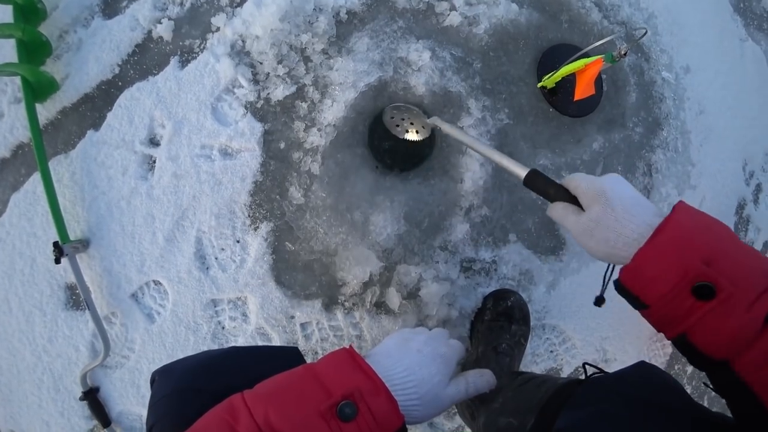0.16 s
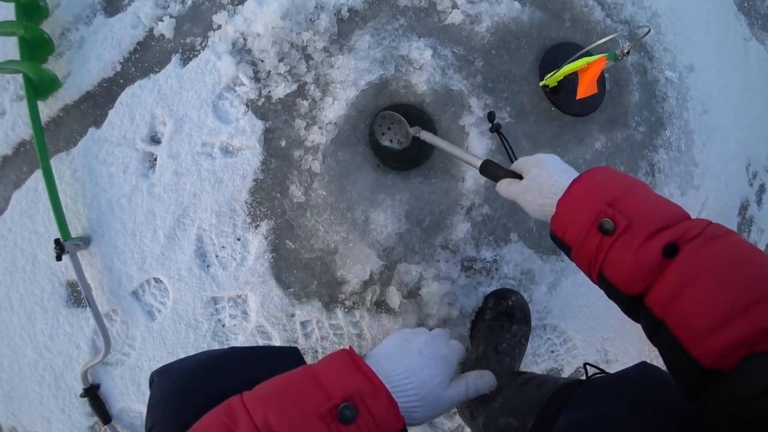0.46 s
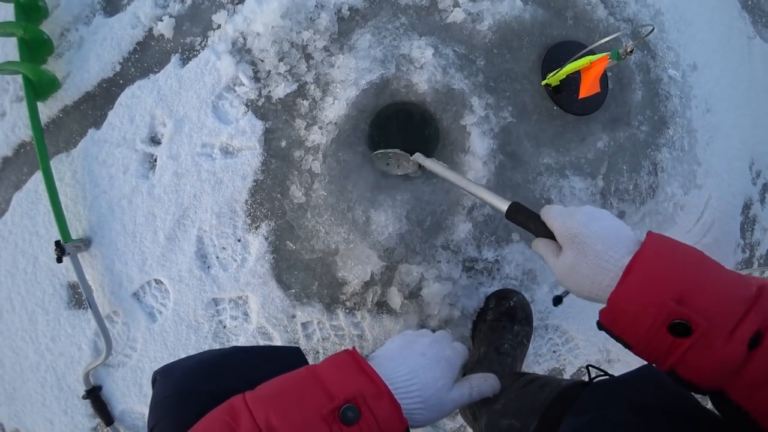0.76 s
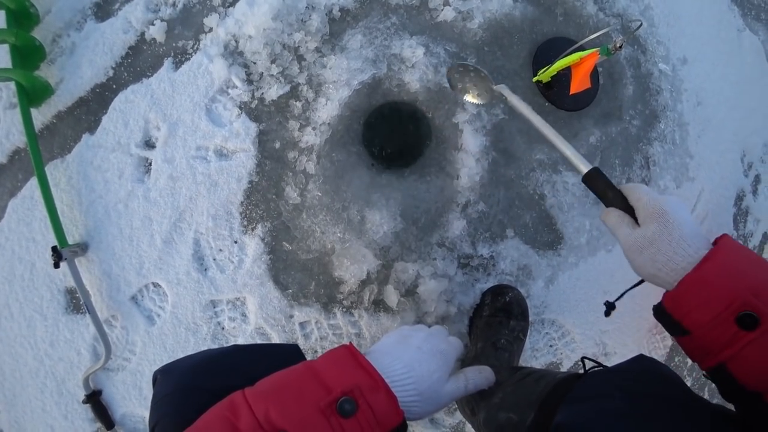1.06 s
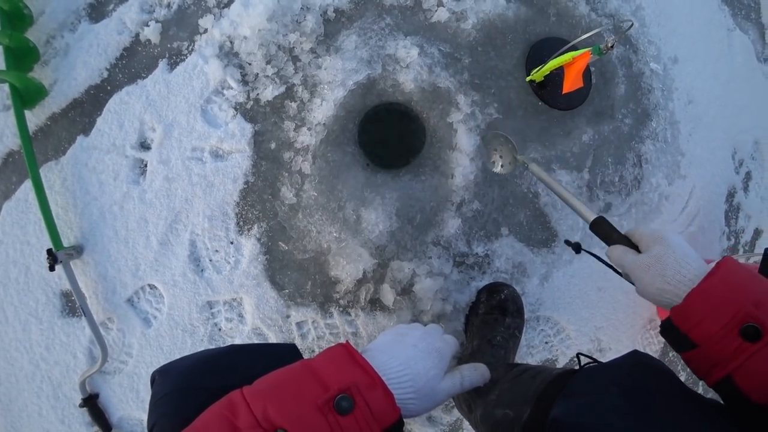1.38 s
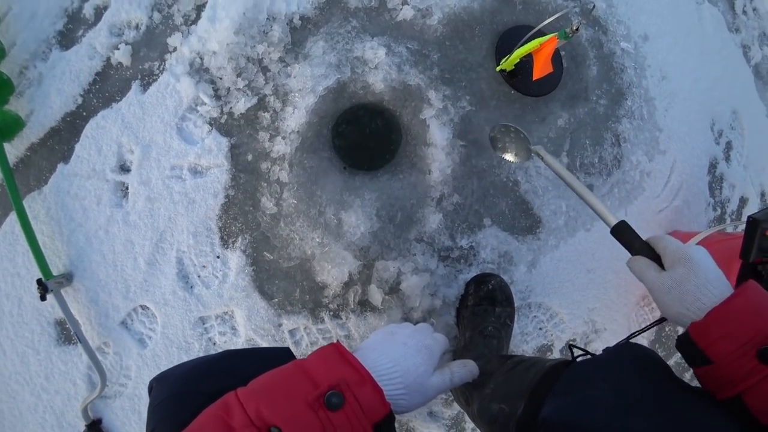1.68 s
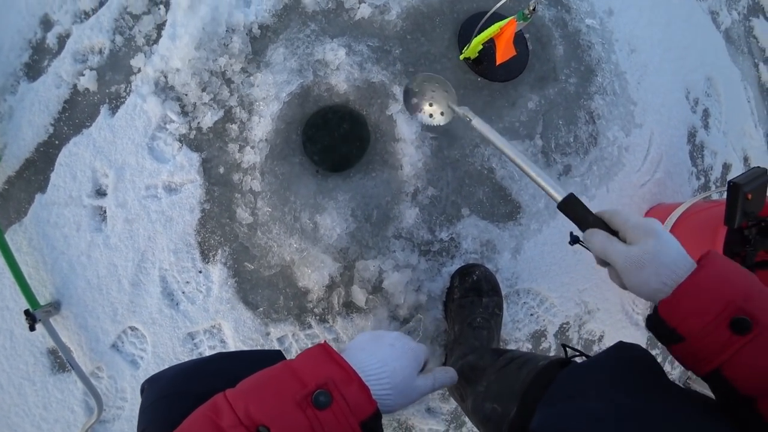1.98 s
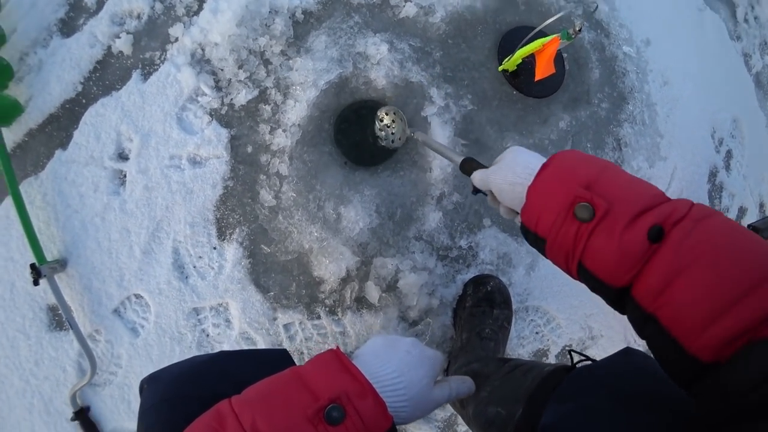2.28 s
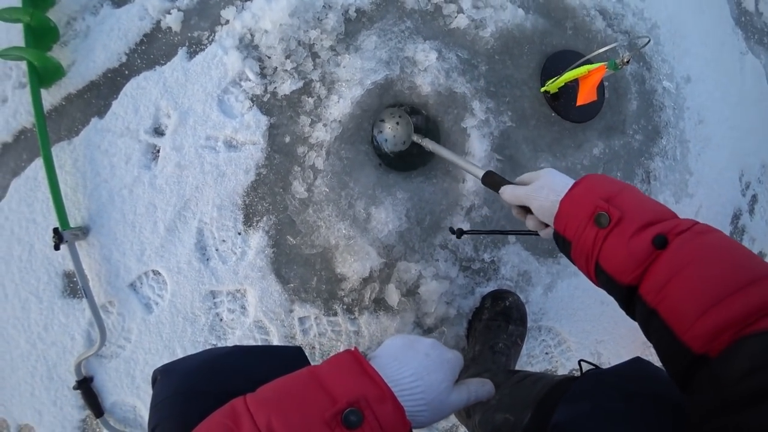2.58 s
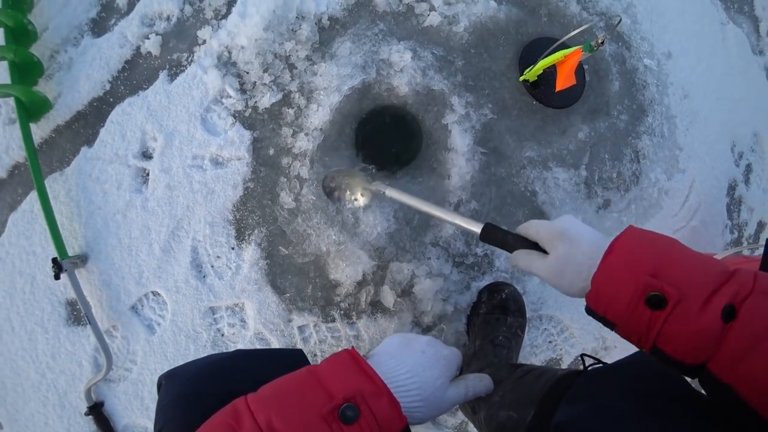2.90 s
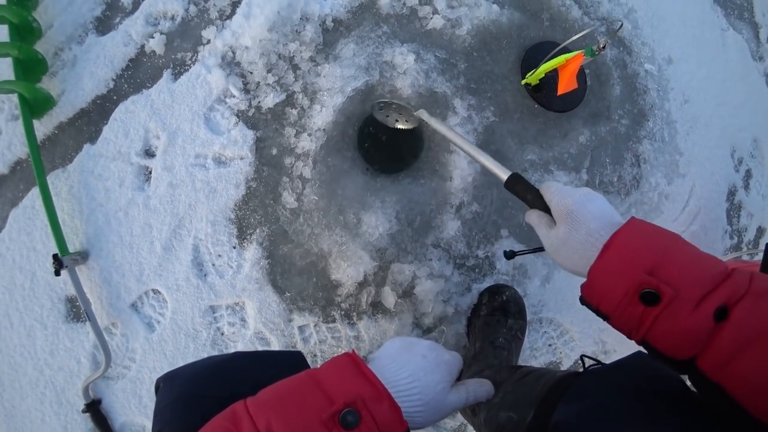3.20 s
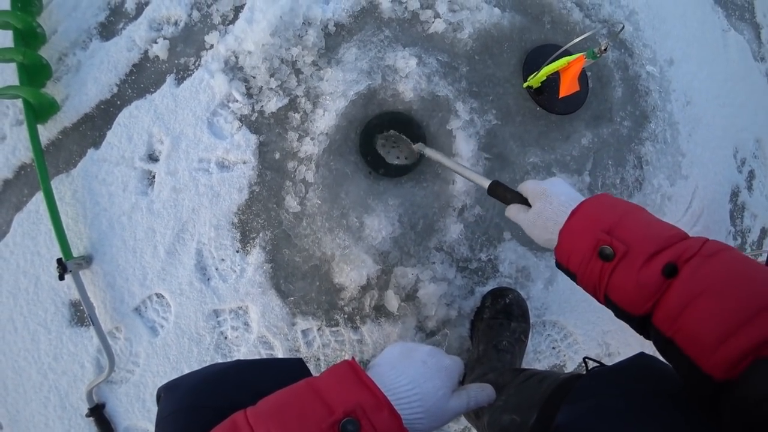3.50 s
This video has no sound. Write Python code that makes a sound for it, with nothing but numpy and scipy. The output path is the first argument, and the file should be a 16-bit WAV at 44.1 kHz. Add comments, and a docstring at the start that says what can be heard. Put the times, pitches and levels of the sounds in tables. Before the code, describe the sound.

A steel skimmer scrapes crust, knocks hard ice and crunches through slushy chips in an ice hole, with small bubbles and nylon sleeve rustle, heard close up in quiet open air.

```python
"""A perforated steel skimmer clears an ice-fishing hole, heard from a camera worn just above it.
Volleys of tiny decaying sines make the bowl crunch through slush and drag over the crust; decaying modes
ring as it is knocked empty, rising sines bubble in the water, and filtered noise trickles in the hole.
Coloured noise makes a nylon sleeve rustle and rub on the right; dull taps and sparse ticks follow.
Quiet open air with a distant, wavering hum lies behind."""
import sys
import numpy as np
from scipy import signal
from scipy.fft import rfft, irfft, next_fast_len
from scipy.io import wavfile

SR = 44100
rng = np.random.default_rng(int(sys.argv[2]) if len(sys.argv) > 2 else 0)


def master(y):
    """Save y as 16-bit WAV."""
    cut = np.clip(np.atleast_2d(y).T, -1, 1)
    pcm = np.round(cut * 32767)  # scale
    wavfile.write(sys.argv[1], SR, pcm.astype(np.int16))


N = 160965


def undb(db):
    """Decibels to gain."""
    return 10 ** (np.asarray(db) / 20)


def unit(x):
    """Scale to rms 1."""
    return x / np.sqrt(np.mean(x ** 2) + 1e-20)


def curve(rows, axis=1):
    """One column of a table, joined by straight lines in time."""
    rows = np.array(rows)
    return np.interp(np.arange(N) / SR, rows[:, 0], rows[:, axis])


def pan(db):
    """Left and right gains for a left-minus-right level difference."""
    return undb(np.array([np.atleast_1d(db), -np.atleast_1d(db)]) / 2)


def colour(x, points):
    """Causal minimum-phase filter through (Hz, dB) points, made by folding the cepstrum."""
    n = next_fast_len(x.shape[-1] // 2 + 1) * 2
    points = np.array(points)
    hz = np.arange(n // 2 + 1) * SR / n
    db = np.interp(np.log(hz + 1), np.log(points[:, 0]), points[:, 1])
    cepstrum = irfft(np.log(undb(db)))
    cepstrum[1:n // 2] *= 2
    cepstrum[n // 2 + 1:] = 0
    response = np.exp(rfft(cepstrum))
    return irfft(rfft(x, n) * response)[..., :x.shape[-1]]


def add(out, start, x):
    """Mix a sound in at a time in seconds."""
    i = max(int(start * SR), 0)
    out[i:i + len(x)] += x[:max(N - i, 0)]


CHIP_RING_S, CHIP_HZ = 0.00072, (294, 16180)  # mean decay time; lowest and highest pitch
SIZE_SPREAD_DB = 3.2  # scale of the random chip levels, for crunches, scrapes and knocks


def grains(n, per_s, spread_db):
    """Tiny fractures at random moments, each chip with its own size and brief pitch; rms 1."""
    when, pitch, size, life = rng.random((int(per_s * n / SR), 4)).T[:, :, None]
    k = np.arange(SR // 200)
    hz = np.minimum(CHIP_HZ[0] + pitch * (CHIP_HZ[1] - CHIP_HZ[0]), SR / 2)
    level = undb(spread_db * np.minimum(-np.log(1 - size), 4))
    decay = np.exp(-k / SR / (CHIP_RING_S * (.5 + life)))
    chips = level * decay * np.sin(2 * np.pi * hz * k / SR)
    places = (when * n).astype(int) + k
    volley = np.bincount(places.ravel(), chips.ravel(), n)
    return unit(volley[len(k):n + len(k)])


def narrow(width_hz):
    """Slowly wandering complex amplitude, rms 1."""
    f = np.fft.fftfreq(N, 1 / SR)
    noise = rng.standard_normal(N) + 1j * rng.standard_normal(N)
    z = np.fft.ifft(np.fft.fft(noise) / (1 + (2 * f / width_hz) ** 2))
    return z / np.std(z)


def carried(amplitude, hz):
    """A wandering amplitude placed on a pitch: a narrow band of noise."""
    phase = 2 * np.pi * np.cumsum(np.broadcast_to(hz, N)) / SR
    return (amplitude * np.exp(1j * phase)).real


def wide(points, side_db):
    """Coloured stereo noise, partly different at the two ears."""
    mid, side = colour(rng.standard_normal((2, N)), points)
    return unit(mid) + undb(side_db) * unit(side) * np.array([[1], [-1]])


def ring(modes, t):
    """Decaying modes after one blow."""
    return sum(undb(db) * np.sin(2 * np.pi * hz * t) * np.exp(-np.log(1000) * t / t60)
               for hz, db, t60 in modes)


# Bowl dragged over the crust beside the hole. Each row: start in seconds, rise in seconds, fall in seconds,
# peak level in dB, how far the start and then the end lie below the peak in dB, treble in dB.
SCRAPE_STROKES = [(0, 0.016, 0.11, -42, -5.5, -0.5, 3), (.108, 0.054, 0.12, -30.5, 6, 11.5, 3),
                  (.68, 0.034, 0.12, -45, 12, 15, -3), (1.393, 0.11, 0.0074, -26.5, 21.5, 5, 1.5),
                  (1.433, 0.0025, 0.048, -32.5, 0, 3, 7), (2.74, 0.029, 0.085, -40.5, 6, 10, -6),
                  (2.86, 0.071, 0.08, -36.5, 9, 16, 1.5), (3.052, 0.02, 0.037, -37, 3, 8, 4.5),
                  (3.162, 0.034, 0.019, -23.5, 10, 3, -1.5), (3.218, 0.049, 0.05, -35.5, -1, 14, 3),
                  (3.426, 0.01, 0.12, -49.5, -18, -6, 4)]
# Colour of ice under the rim, close to the microphone. Each row: frequency in Hz, gain in dB.
CRUST_COLOUR = [(300, -31), (1200, -14.5), (2500, -0.5), (3300, -0.5), (4300, -0.5), (5800, -3.5),
                (7500, -1.5), (10300, -3.5), (12000, -9.5), (15500, -14.5)]
SCRAPE_GRAINS_PER_S = 9500


def scrapes():
    """The rim ploughs the crust: dense grains swell with the stroke and catch unevenly."""
    out = np.zeros(N)
    for start, rise, fall, db, start_db, end_db, treble_db in SCRAPE_STROKES:
        x = colour(grains(SR // 4, SCRAPE_GRAINS_PER_S, spread_db=SIZE_SPREAD_DB), CRUST_COLOUR)
        x = unit(colour(x, [(4000, 0), (8000, treble_db)]))
        corners = np.cumsum([0, .003, abs(rise), abs(fall), .025])
        swell_db = np.interp(np.arange(len(x)) / SR, corners, [-40, -start_db, 0, -end_db, -70])
        add(out, start - .003, undb(db + swell_db) * x)
    return out * undb(1.0 * narrow(width_hz=110).real)


# Rustle of the jacket, close to the camera. Each row: time in seconds, level of the folds in dB,
# level of the nylon hiss in dB; both levels then waver.
SLEEVE_LEVELS = [(0, -47, -51), (.24, -47, -71), (.3, -48.5, -48), (.37, -52.5, -51.5), (.45, -48, -46.5),
                 (.62, -53.5, -54.5), (.75, -49.5, -45), (.92, -47.5, -50.5), (1.1, -50.5, -57),
                 (1.22, -50.5, -59.5), (1.41, -59, -49), (1.53, -52, -51), (1.72, -49.5, -49),
                 (1.97, -48.5, -55.5), (2.11, -48.5, -45), (2.19, -53, -51.5), (2.243, -54, -45),
                 (2.26, -52, -57.5), (2.55, -49, -63), (2.85, -48.5, -47.5), (3.08, -59.5, -48),
                 (3.2, -52, -54.5), (3.38, -45, -47.5), (3.65, -50.5, -50)]
# Colour of the folds. Each row: frequency in Hz, gain in dB.
FOLDS_COLOUR = [(30, -55), (100, -9.5), (200, -6), (320, 3), (430, -3), (650, -3.5), (1300, -5.5),
                (2200, -9.5), (4000, -14.5), (9000, -24), (15000, -31)]
# Colour of the nylon hiss. Each row: frequency in Hz, gain in dB.
HISS_COLOUR = [(500, -20), (1500, -8.5), (2600, -5.5), (4000, 4.5), (5800, 0), (8300, 0), (11000, -8.5),
               (15500, -21)]
# The weave singing as the sleeve slides. Each row: time in seconds, pitch in Hz, level in dB.
WEAVE_SLIDES = [(1.99, 2393, -85), (2.05, 2800, -49), (2.125, 3420, -40.5), (2.16, 3550, -45),
                (2.2, 2800, -44), (2.27, 1900, -76), (3.56, 3300, -82), (3.6, 3200, -54), (3.63, 3100, -40),
                (3.65, 3050, -52)]
WEAVE_WIDTH_HZ, NYLON_PAN_DB = 700, -4  # the nylon is louder on the right


def sleeve():
    """Folds rumple, nylon hisses, and the ribbed weave sings on fast slides."""
    folds_db = curve(SLEEVE_LEVELS, axis=1) + 2 * narrow(width_hz=21).real
    folds = wide(FOLDS_COLOUR, side_db=-7.5) * undb(folds_db)
    hiss_db = curve(SLEEVE_LEVELS, axis=2) + 1.9 * narrow(width_hz=17).real
    hiss = wide(HISS_COLOUR, side_db=-7.0) * undb(hiss_db)
    weave = carried(narrow(width_hz=WEAVE_WIDTH_HZ), curve(WEAVE_SLIDES, axis=1))
    weave = weave * undb(curve(WEAVE_SLIDES, axis=2))
    return folds + (hiss + weave) * pan(NYLON_PAN_DB)


# Colour of the open air around the hole. Each row: frequency in Hz, gain in dB.
AIR_COLOUR = [(20, -13), (45, -1), (70, -0.5), (110, -4.5), (200, -7.5), (400, -15.5), (1000, -30.5),
              (4000, -33), (10000, -35), (15500, -43)]
AIR_DB, HUM_HZ, HUM_DB = -54.5, 86, -60.5


def air():
    """Quiet open air, as coloured noise, with a far, wavering hum."""
    hum = carried(narrow(width_hz=5.0), HUM_HZ)
    return wide(AIR_COLOUR, side_db=-16.5) * undb(AIR_DB) + hum * np.sqrt(2) * undb(HUM_DB)


BUBBLE_ATTACK_S = .0015


def bubble(hz, rise, t60):
    """One air pocket rings and rises in pitch as it nears the surface."""
    t = np.arange(int(t60 * SR)) / SR
    pitch = np.minimum(hz * 2 ** (rise * t), SR / 3)
    env = (1 - np.exp(-t / BUBBLE_ATTACK_S)) * np.exp(-np.log(1000) * (t / t60) ** 1.244)
    return env * np.sin(2 * np.pi * np.cumsum(pitch) / SR)


# Air pockets closing in the water below the microphone. Each row: start in seconds, starting pitch in Hz,
# rise in octaves per second, level in dB, time to fall by 60 dB in seconds.
AIR_POCKETS = [(.0675, 1420, 95, -23, .03), (3.4148, 1890, 21, -18.5, 0.019), (0.1537, 860, 34, -18, 0.025),
               (0.679, 726, 25, -34, 0.092), (2.61, 378, 11.5, -30.5, 0.15), (2.647, 550, 15, -36.5, .18),
               (2.793, 862, 17, -30.5, 0.075), (2.455, 5300, 23, -20.5, 0.0084),
               (2.531, 4380, 3.5, -32.5, 0.03), (2.623, 3500, 13, -29.5, 0.012),
               (2.607, 7600, 2.2, -30.5, 0.022)]
# Slush churning in the hole. Each row: start in seconds, length in seconds,
# level of a typical small bubble in dB.
SLUSH_CHURNS = [(.7, 0.06, -39), (2.71, .13, -41)]
CHURN_BUBBLES_PER_S, CHURN_HZ, CHURN_RISE_OCT_PER_S, CHURN_T60_S = 260, (687, 2625), 14, 0.013


def bubbles():
    """Single large bubbles, and swarms of small ones where the slush is churned; all wobble a little."""
    out = np.zeros(N)
    for start, hz, rise, db, t60 in AIR_POCKETS:
        add(out, start, undb(db) * bubble(hz, rise, t60))
    for start, length, db in SLUSH_CHURNS:
        for when, pitch, size in rng.random((int(length * CHURN_BUBBLES_PER_S), 3)):
            hz = CHURN_HZ[0] * (CHURN_HZ[1] / CHURN_HZ[0]) ** np.sqrt(pitch)
            small = bubble(hz, CHURN_RISE_OCT_PER_S, CHURN_T60_S)
            add(out, start + when * length, undb(db) * 2 * size * small)
    return out * undb(2.0 * narrow(width_hz=59).real)


# Steel striking hard ice near the camera. Each row: start in seconds, level of the blow in dB,
# level of the lasting ring in dB, level of the chips in dB, boost of the modes below 2500 Hz in dB.
ICE_KNOCKS = [(0.1527, -7, -14, -20, -17), (1.3591, -7, -9, -21.5, -2), (3.4148, -23, -18, -29, 16)]
# Modes of the skimmer. Each row: frequency in Hz, relative level in dB, time to fall by 60 dB in seconds.
STEEL_MODES = [(1645, -17.5, 0.032), (2060, -11, 0.022), (2850, -16, 0.045), (4000, -5.5, 0.021),
               (4470, 1.5, 0.015), (4680, -8, 0.015), (5100, -14, 0.025), (7100, -13, 0.039),
               (7600, -15, 0.015)]
# The close pair that rings on when the bowl bounces free. Each row: frequency in Hz, relative level in dB,
# time to fall by 60 dB in seconds.
FREE_RING = [(6445, -11.5, 0.035), (6460, -8, 0.074)]
CONTACT_S, CHIP_DECAY_S = .00015, .005


def knocks():
    """Hard blows ring the steel and shatter a few chips; the small bowl radiates no bass."""
    out = np.zeros(N)
    for start, db, ring_db, chips_db, low_db in ICE_KNOCKS:
        chips = grains(SR // 6, SCRAPE_GRAINS_PER_S, spread_db=SIZE_SPREAD_DB)
        chips = unit(colour(chips, CRUST_COLOUR))
        t = np.arange(len(chips)) / SR
        modes = [(hz, g + low_db * (hz < 2500), t60) for hz, g, t60 in STEEL_MODES]
        steel = ring(modes, t) * 0.47 + undb(ring_db) * ring(FREE_RING, t)
        blow = undb(db) * steel * (1 - np.exp(-t / CONTACT_S))
        shatter = undb(chips_db) * chips * np.exp(-t / CHIP_DECAY_S)
        add(out, start, blow + shatter)
    return colour(out, [(300, -26), (700, 4.0), (1400, -1.5), (8500, 1.5), (12000, -4.0)])


# Sleeve rubbing against the jacket's side, close to the camera. Each row: start in seconds,
# rise in seconds, fall in seconds, level in dB before the roughness.
SLEEVE_RUBS = [(.25, 0.1, 0.12, -41), (2.149, 0.094, 0.013, -39.5), (3.3, 0.14, 0.095, -48.5)]
# Colour of the rubbing cloth. Each row: frequency in Hz, gain in dB.
CLOTH_COLOUR = [(300, -17), (700, -2), (1350, 0), (2400, -1), (4000, -8), (10000, -33)]


def rubs():
    """Cloth dragged over cloth: a rough rasp that swells with the reach."""
    t = np.arange(N) / SR
    env = sum(undb(db) * np.interp(t, start + np.cumsum([0, abs(rise), abs(fall)]), [0, 1, 0])
              for start, rise, fall, db in SLEEVE_RUBS)
    return env * wide(CLOTH_COLOUR, side_db=-13) * undb(3.8 * narrow(width_hz=120).real)


# Bowl breaking through ice chips in the hole. Each row: start in seconds, length in seconds,
# level in dB before the common trim, body in dB, treble in dB.
CHIP_CRUNCHES = [(0.376, 0.0063, -38.5, 5, 4), (0.39, 0.02, -29.5, 6, 9), (0.428, 0.016, -40, 3, 11),
                 (0.452, 0.0032, -25, -3, 11.5), (0.461, 0.015, -34, 1, 5), (0.482, 0.0047, -21.5, -8, 4),
                 (0.501, 0.019, -41, 5, 5), (0.54, 0.0035, -38.5, -1, -9), (0.5684, 0.018, -40.5, -7, -3.5),
                 (0.613, 0.0097, -37, 7, -8), (0.6475, 0.007, -32.5, 1.5, -6), (0.672, 0.019, -37, 12, -7),
                 (0.703, 0.01, -30.5, 2, -8), (0.718, 0.0088, -30, 8, -3), (0.73, 0.0068, -26.5, 7, -10),
                 (0.74, 0.01, -32, 1, -10), (0.753, 0.0089, -23, 0.5, -15), (0.786, 0.011, -24, -3, 0.5),
                 (0.82, 0.008, -31.5, 6, 4), (0.83, 0.009, -24.5, -2, -1), (0.844, 0.0071, -32, -1, 2),
                 (0.858, 0.012, -29, -14, 5.5), (1.265, 0.0025, -37.5, -37, -3),
                 (1.453, .0012, -28, -14, -5), (2.32, 0.0044, -36, -9, 35), (2.331, 0.033, -41.5, -13, 4),
                 (2.369, 0.012, -32, 1, -2.5), (2.393, 0.0069, -33.5, 10.5, -3),
                 (2.4563, 0.0015, -38.5, -20, 4), (2.531, 0.01, -43, 7, -7), (2.6085, 0.0012, -37, 8, 2),
                 (2.71, 0.0076, -39, -4, -10.5), (2.7238, 0.0047, -35, 10, -16),
                 (2.758, 0.013, -37, 1, -14), (2.773, 0.0083, -31.5, 3, -8), (2.836, 0.0038, -34.5, 0, 0),
                 (2.8753, 0.011, -27.5, 3, 2.5), (2.916, 0.01, -31.5, -7, -3),
                 (2.9245, 0.0042, -27.5, -16, -4), (2.941, 0.0038, -26.5, -18, -7),
                 (2.992, 0.003, -36, -8, 12), (3.07, 0.0067, -29.5, -6, 1), (3.115, 0.0015, -27, -14, 10),
                 (3.126, 0.002, -34.5, 3, -1), (3.1495, 0.002, -29.5, -12, 6),
                 (3.413, 0.0094, -26.5, 3, 7.5), (3.425, 0.0089, -39, -5, 2), (3.501, 0.0036, -36, -5, 8),
                 (3.547, 0.023, -34.5, -28, -2)]
# Colour of a crunch at the camera. Each row: frequency in Hz, gain in dB.
CHIPS_COLOUR = [(180, -58), (300, -22), (610, -11.5), (1370, -2.5), (1540, -8), (2480, -2), (3400, -5),
                (4000, -4), (8840, -3), (15500, -17)]
# Resonances of the bowl among the chips. Each row: frequency in Hz, width in Hz, relative level in dB.
BOWL_RESONANCES = [(1783, 44, -3), (2207, 72, -5), (2480, 90, -7), (3960, 62, -4.5), (4220, 110, -6.5),
                   (5230, 130, -10), (6030, 110, -8), (6570, 120, -6.5), (7270, 59, -4), (7740, 64, -0.5),
                   (8490, 35, -1), (8890, 106, -4), (10660, 80, -3.5)]
BOWL_DB, BOWL_SCATTER_DB, BOWL_DETUNE = 7, 3, .02  # common boost; random spread of level and of pitch
CRUNCH_DB, CRUNCH_ATTACK_S, CRUNCH_RELEASE_S = -1, 0.00074, 0.0014  # CRUNCH_DB is the common trim
CRUNCH_GRAINS_PER_S = 9000


def bowl_ring(x):
    """The bowl's resonances, shifted a little in level and pitch at each contact."""
    out = np.zeros(len(x))
    scatter = rng.standard_normal((len(BOWL_RESONANCES), 2))
    for (hz, width, db), (louder, shift) in zip(BOWL_RESONANCES, scatter):
        b, a = signal.iirpeak(hz * (1 + BOWL_DETUNE * shift), hz / width, SR)
        out += undb(db + BOWL_DB + BOWL_SCATTER_DB * louder) * signal.lfilter(b, a, x)
    return out


def crunches():
    """Short volleys of fractures ring the bowl differently with each contact and load of slush."""
    out = np.zeros(N)
    for start, length, db, body_db, treble_db in CHIP_CRUNCHES:
        x = grains(SR // 10, CRUNCH_GRAINS_PER_S, spread_db=SIZE_SPREAD_DB)
        t = np.arange(len(x)) / SR
        x = x * np.minimum(t / CRUNCH_ATTACK_S, 1) * np.exp(-np.maximum(t - length, 0) / CRUNCH_RELEASE_S)
        x = colour(x + bowl_ring(x), CHIPS_COLOUR)
        x = colour(x, [(250, body_db - 11), (800, body_db - 9.5), (1900, body_db),
                       (3200, 0), (5000, 0), (7500, treble_db - 0.5)])
        # the level holds over the length of the crunch and its release
        x = x * np.sqrt((length + CRUNCH_RELEASE_S) * SR / np.sum(x ** 2))
        add(out, start, x * undb(db + CRUNCH_DB))
    return out


# Running water exciting the hole's air column. Each row: start in seconds, length in seconds, level in dB.
HOLE_TRICKLES = [(.5, 0.69, -51), (2.715, .06, -46)]
HOLE_HZ, HOLE_WIDTH_HZ = 1260, 140


def hole():
    """Water running back makes the hole resound softly: a narrow band of noise swells and fades."""
    t = np.arange(N) / SR
    env = sum(undb(db) * np.sin(np.pi * np.clip((t - start) / length, 0, 1))
              for start, length, db in HOLE_TRICKLES)
    return env * carried(narrow(width_hz=HOLE_WIDTH_HZ), HOLE_HZ)


# Dull taps of clothing and the handle's cord. Each row: start in seconds, level in dB,
# click pitch in Hz, click level in dB.
CLOTH_TAPS = [(1.8074, -32.5, 3670, 0), (1.862, -39.5, 2480, 1), (1.882, -37, 1400, -5),
              (1.909, -28.5, 2400, 3), (1.955, -39, 1300, -13), (2.043, -35.5, 1110, -4),
              (2.073, -36, 1120, 7)]
TAP_DECAY_S = 0.0038


def taps():
    """A soft, quickly damped thud with a click of its own pitch."""
    out, t = np.zeros(N), np.arange(SR // 10) / SR
    for start, db, hz, click_db in CLOTH_TAPS:
        x = rng.standard_normal(len(t)) * np.exp(-t / TAP_DECAY_S)
        click = signal.lfilter(*signal.iirpeak(hz, 3, SR), x)
        thud = colour(x, [(50, -16), (140, 0), (400, 0), (700, -1.5), (1300, 1),
                          (1900, -13.5), (15000, -43)])
        x = thud + undb(click_db) * click
        add(out, start, undb(db) * x * np.sqrt(TAP_DECAY_S * SR / np.sum(x ** 2)))
    return out


# Droplets and crumbs falling from the lifted bowl. Each row: start in seconds, length in seconds,
# level in dB before the fade.
BOWL_DRIBBLES = [(2.963, .3, -50)]
DRIBBLES_PER_S, DRIBBLE_FADE_S = 120, 0.38


def dribbles():
    """Sparse tiny ticks on the ice, dying away as the bowl drains."""
    out = np.zeros(N)
    for start, length, db in BOWL_DRIBBLES:
        x = grains(int(length * SR), DRIBBLES_PER_S, spread_db=0.5)
        x = unit(colour(x, CRUST_COLOUR))
        add(out, start, undb(db) * x * np.exp(-np.arange(len(x)) / SR / DRIBBLE_FADE_S))
    return out


ECHO_DB, ECHO_DECAY_S = -15.5, 0.0021


def reflections(tool):
    """The hole and the body throw back short reflections: decaying noise, different at each ear."""
    t = np.arange(SR // 10) / SR
    echo = rng.standard_normal((2, len(t))) * np.exp(-t / ECHO_DECAY_S)
    echo = colour(echo, [(2500, -5), (8000, -0.5)])
    echo *= undb(ECHO_DB) / np.sqrt(np.sum(echo ** 2, axis=1, keepdims=True))
    return signal.fftconvolve(tool[None], echo, axes=1)[:, :N]


# Where the bowl is in front of the camera. Each row: time in seconds, left minus right level in dB.
BOWL_PLACE = [(0, 2.5), (.4, 0), (.85, -1), (1.36, -4.5), (1.5, -2), (2.35, 0), (2.93, -1), (3.08, 1.5),
              (3.22, 1.5), (3.42, -1), (3.65, 1)]


def scene():
    """The skimmer moves across the ice, among the wearer's clothing and the open air."""
    tool = scrapes() + bubbles() + knocks() + crunches() + hole() + dribbles()
    heard = (tool + reflections(tool)) * pan(curve(BOWL_PLACE))
    return heard + sleeve() + air() + rubs() * pan(-5.0) + taps()


# Sensitivity of the camera's two microphone ports. Each row: frequency in Hz, left minus right in dB.
PORT_LEVELS = [(60, 0), (140, 2), (330, 2.5), (550, 6), (1100, -0.5), (2200, -1.5), (8000, -2.5),
               (13000, -1.5)]
# Lead of the left port. Each row: frequency in Hz, phase in radians.
PORT_LEAD = [(40, -0.088), (340, 0.16), (1700, 0.14), (4000, 0.27), (8000, -0.27), (12000, -0.52),
             (15000, -0.14)]
TOP_HZ = 15900


def record(dry):
    """The two ports differ a little in colour and timing; the camera cuts the top."""
    left, right = (colour(channel, [(hz, sign * db / 2) for hz, db in PORT_LEVELS])
                   for channel, sign in zip(dry, (1, -1)))
    lead = np.interp(np.fft.rfftfreq(N, 1 / SR), *np.array(PORT_LEAD).T)
    left = irfft(rfft(left) * np.exp(1j * lead), N)
    top_cut = signal.ellip(10, .2, 80, TOP_HZ, fs=SR, output="sos")
    return signal.sosfilt(top_cut, [left, right])


dry = scene()
out = record(dry)
master(out)
```